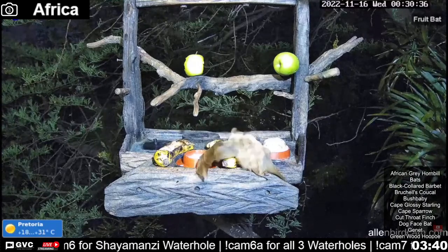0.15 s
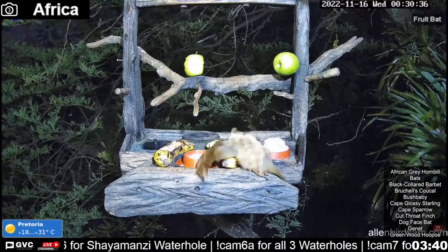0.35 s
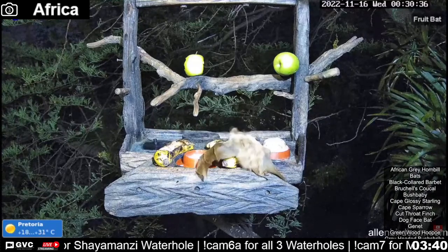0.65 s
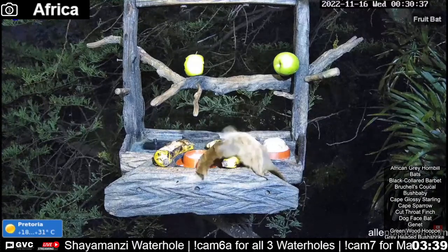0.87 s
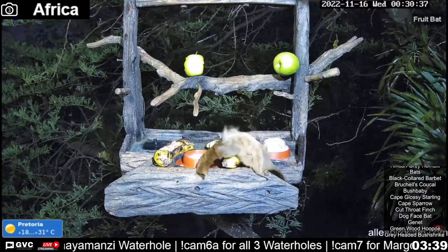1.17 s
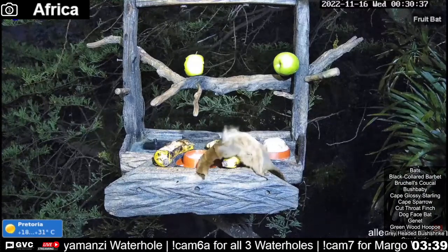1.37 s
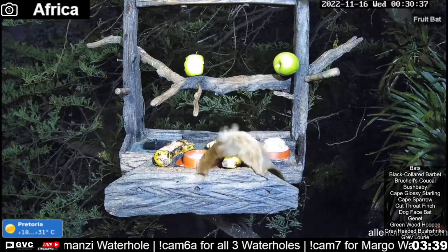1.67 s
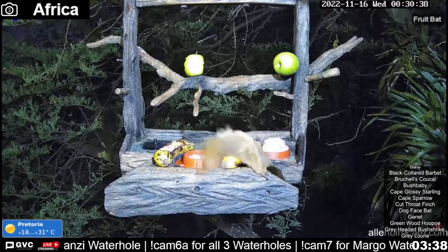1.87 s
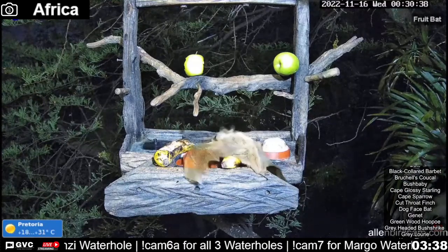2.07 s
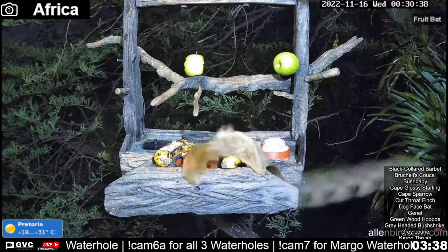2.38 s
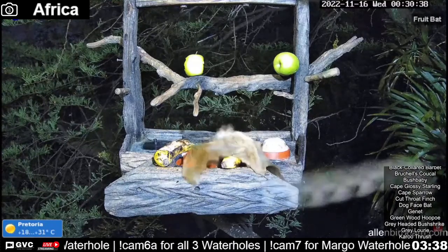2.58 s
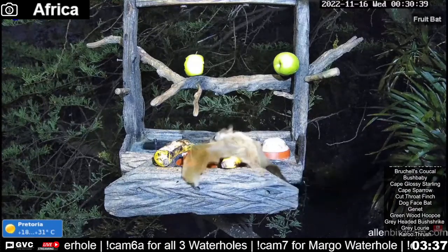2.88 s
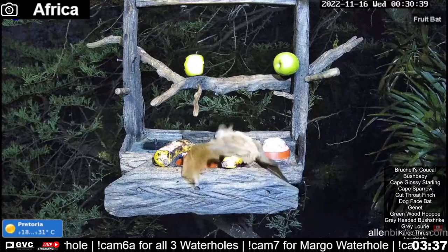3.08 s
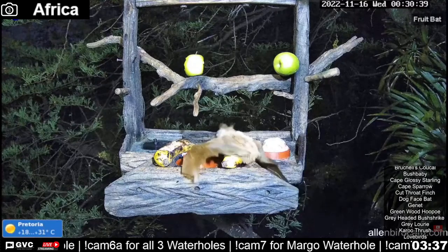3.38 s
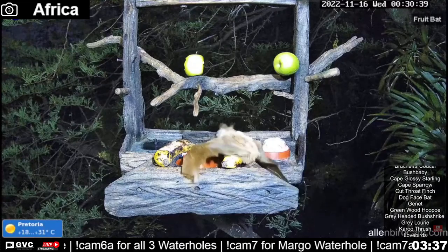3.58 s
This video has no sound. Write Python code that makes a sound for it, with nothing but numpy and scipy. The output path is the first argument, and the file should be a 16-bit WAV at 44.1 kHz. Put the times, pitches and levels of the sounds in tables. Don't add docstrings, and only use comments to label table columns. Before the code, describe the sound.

Rattling toad croaks fill a night garden, with three brief bat chirps and sharp claw ticks

```python
import sys
import numpy as np
from scipy import signal
from scipy.fft import rfft, irfft
from scipy.io import wavfile
from scipy.ndimage import uniform_filter1d

SR = 44100
rng = np.random.default_rng(int(sys.argv[2]) if len(sys.argv) > 2 else 0)


def to_wav(s):
    ch = np.atleast_2d(s).T
    pcm = np.round(np.clip(ch, -1, 1) * 32767)
    wavfile.write(sys.argv[1], SR, pcm.astype(np.int16))


def invert_db(level):
    return 10 ** (np.asarray(level, dtype=float) / 20)


N = 164934


def evened(x):
    return x / np.sqrt(np.mean(x ** 2) + 1e-20)


def wander(n, width):
    return evened(uniform_filter1d(rng.standard_normal(n), width))


def read(points, hz):
    f, value = np.transpose(points)
    return np.interp(np.log(hz + 1), np.log(f + 1), value)


def colour(x, points):
    return irfft(rfft(x) * invert_db(read(points, np.fft.rfftfreq(N, 1 / SR))), N)


def add(mix, s, sound):
    part = mix[max(round(s * SR), 0):][:len(sound)]
    part += sound[:len(part)]


def resonate(x, hz, width_hz):
    turn = np.exp(2j * np.pi * np.cumsum(hz * np.ones(len(x))) / SR)
    r = np.exp(-np.pi * width_hz * 1.5 / SR)
    return 2 * (turn * signal.lfilter([(1 - r) ** 2], [1, -2 * r, r * r], x / turn)).real


def garden(x, echo_db, t60_s):
    t = np.arange(SR // 2) / SR
    tail = rng.standard_normal((2, len(t)))
    tail = tail * (rng.random((2, len(t))) < .06)
    tail = tail * invert_db(-60 * t / t60_s) * np.minimum(t / 0.013, 1)
    return x + invert_db(echo_db) * irfft(rfft(x) * rfft(tail / np.linalg.norm(tail[0]), N), N)


# start in seconds, length in seconds, level in dB, settled pitch in Hz, settling in seconds.
CHIRPS = [
    (1.016, 0.074, -38, 1635, 0.084),
    (2.036, 0.062, -35.5, 1656, 0.05),
    (3.326, 0.058, -38, 1629, 0.03),
]
# level in dB, from the fundamental up.
PARTIALS_DB = [-7, -1.5, 0, -11, -27, -50]


def bat():
    drop, rise_s, fall_s, flutter_db = 0.17, .026, 0.052, 2.5
    out = np.zeros(N)
    t = np.arange(0, .2, 1 / SR)
    for start, length_s, level_db, hz, settle_s in CHIRPS:
        turns = np.cumsum(hz * (1 + drop * np.clip(1 - t / settle_s, 0, 1) ** 1.6)) / SR
        shape = np.minimum(t / min(rise_s, settle_s), 1) ** 0.59
        shape = shape * np.clip((length_s + fall_s - t) / fall_s, 0, 1) ** 2
        flutter = uniform_filter1d(rng.standard_normal(len(t)), 200)
        shape = shape * invert_db(flutter_db * evened(uniform_filter1d(flutter, 200)))
        call = np.zeros(len(t))
        for k, db in enumerate(PARTIALS_DB):
            opening = np.minimum(t / settle_s, 1) ** (.4 * k)
            call += invert_db(db) * opening * np.sin(2 * np.pi * (k + 1) * turns)
        add(out, start, invert_db(level_db) * shape * call)
    return garden(out, echo_db=0.5, t60_s=.5)


# time in seconds, effort in dB, throat pitch in Hz.
CHORUS = [(0, -30, 1280), (0.198, -40.5, 1420), (0.262, -65, 1350), (.47, -44, 1237), (0.519, -41.5, 1210),
          (.8, -32, 1243), (1.349, -33, 1211), (1.552, -33, 1192), (1.951, -32, 1303), (2.348, -36, 1157),
          (2.502, -33, 1256), (3.74, -30, 1208)]
# ratio to throat pitch, width in Hz, level in dB.
SAC = [(0.377, 56.5, -22.5), (.7, 105.2, -8.5), (0.802, 120.4, -31), (1.001, 232.5, 23.5),
       (1.18, 140.4, -18.5), (1.328, 107.3, -31.5), (1.852, 372, 5.5), (2.198, 418, 5.5), (2.95, 205, -5.5)]
TOAD_RATES_HZ = [8.6, 31, 14.5, 16, 17, 15, 29, 18]


def toad_crowd():
    pulse_s, swell_db = 0.0063, 2.5
    t = np.arange(N) / SR
    s, effort_db, throat_hz = np.transpose(CHORUS)
    beats = np.zeros(N)
    for rate_hz in TOAD_RATES_HZ:
        drift = wander(N, 9000)
        turns = np.floor(np.cumsum(rate_hz * (1 + 0.0826 * drift)) / SR + rng.random())
        beats[1:] += np.diff(turns) * invert_db(swell_db * np.roll(drift, N // 2)[1:])
    puff = signal.windows.hann(round(pulse_s * SR) * 2)
    rasp = signal.oaconvolve(beats, puff)[:N] * rng.standard_normal(N)
    pitch_hz = np.interp(t, s, throat_hz)
    sac = np.zeros(N)
    for k, (ratio, width_hz, db) in enumerate(SAC):
        sac += (-1) ** k * invert_db(db) * resonate(rasp, ratio * pitch_hz, width_hz)
    return evened(garden(sac, echo_db=8, t60_s=0.86)) * invert_db(np.interp(t, s, effort_db) - 3.0)


# start in seconds, peak in dB, throat pitch in Hz.
FIRST_BOUT = [(0.062, -20.5, 1204), (0.113, -34, 1300), (0.135, -25, 1370), (0.19, -35, 1176),
              (0.271, -36, 1360), (0.332, -34.5, 1250), (0.394, -40.5, 1355), (0.412, -40.5, 1250),
              (0.433, -39, 1090), (0.492, -37.5, 1230), (0.512, -25.5, 1213), (0.54, -44, 1150),
              (0.558, -29, 1197), (0.573, -36, 1247), (0.596, -22.5, 1206), (0.637, -30, 1270),
              (0.67, -22.5, 1155), (0.709, -25.5, 1215), (0.757, -23, 1258), (0.771, -24.5, 1214),
              (0.791, -30.5, 1180), (0.82, -28.5, 1210), (0.837, -20, 1222), (0.889, -20.5, 1313),
              (0.953, -22.5, 1224), (0.981, -20.5, 1216), (1.01, -25.5, 1252), (1.024, -21, 1238),
              (1.043, -22.5, 1175), (1.082, -15.5, 1215), (1.137, -23, 1207), (1.163, -22, 1160),
              (1.201, -17.5, 1256), (1.231, -35.5, 1214), (1.257, -20.5, 1202), (1.292, -31.5, 1196),
              (1.315, -22, 1207), (1.344, -20.5, 1208), (1.367, -29, 1247), (1.422, -26.5, 1280),
              (1.467, -21.5, 1280), (1.518, -25.5, 1233), (1.576, -31, 1220), (1.592, -23.5, 1314),
              (1.612, -33, 1220), (1.642, -36, 1250), (1.674, -19.5, 1354), (1.71, -29.5, 1040),
              (1.728, -22, 1180), (1.761, -24.5, 1390), (1.8, -31, 1304), (1.822, -27, 1100),
              (1.847, -22, 1308), (1.863, -26, 1162), (1.908, -29, 1060), (1.921, -21, 1320)]
# start in seconds, peak in dB, throat pitch in Hz.
SECOND_BOUT = [(1.993, -23.5, 1082), (2.028, -26.5, 1194), (2.064, -21, 1047), (2.098, -31.5, 1293),
               (2.138, -22.5, 1163), (2.176, -34, 1247), (2.203, -26.5, 1114), (2.245, -28, 1148),
               (2.264, -35.5, 1284), (2.286, -23, 1148), (2.312, -34.5, 1316), (2.342, -25, 1077),
               (2.384, -27, 1230), (2.402, -22.5, 1200), (2.447, -31.5, 1166), (2.464, -23.5, 1130),
               (2.49, -26, 1224), (2.523, -24.5, 1050), (2.576, -25.5, 1105), (2.607, -29, 1310),
               (2.632, -23.5, 1330), (2.675, -22.5, 1340), (2.715, -29, 1170), (2.735, -22.5, 1148),
               (2.754, -37.5, 1223), (2.796, -25.5, 1290), (2.815, -32.5, 1293), (2.847, -25.5, 1220),
               (2.893, -18.5, 1190), (2.914, -26, 1210), (2.967, -26.5, 1146), (2.985, -24.5, 1140),
               (3.032, -29, 1346), (3.079, -21.5, 1230), (3.102, -25, 1172), (3.152, -19.5, 1204),
               (3.227, -22.5, 1220), (3.289, -20.5, 1222), (3.322, -28.5, 1143), (3.354, -20.5, 1146),
               (3.391, -22, 1176), (3.418, -18, 1170), (3.479, -18.5, 1175), (3.504, -22, 1184),
               (3.535, -27.5, 1225), (3.593, -25.5, 1190), (3.621, -23.5, 1160), (3.644, -19.5, 1284),
               (3.696, -24, 1150), (3.712, -19.5, 1300)]


def near_toads():
    rise_s, fall_s, repeat_s, near_db, repeat_db = 0.0017, 0.0037, .0055, -2, -5
    out = np.zeros(N)
    t = np.arange(1500) / SR
    knock = (1 - np.exp(-t / rise_s)) * np.exp(-t / fall_s) * 2
    thump = 0.04 * np.sin(2 * np.pi * 460 * t) * np.sin(np.pi * np.minimum(t / 0.024, 1))
    for start, db, hz in FIRST_BOUT + SECOND_BOUT:
        modes = np.sin(2 * np.pi * hz * t)
        modes = modes + 0.38 * np.sin(2 * np.pi * 0.842 * hz * t)
        modes = modes + 0.13 * np.sin(2 * np.pi * 2.1 * hz * t)
        ring = knock * modes + thump
        add(out, start, invert_db(db + near_db) * ring)
        add(out, start + repeat_s, invert_db(db + near_db + repeat_db) * ring)
    return garden(out, echo_db=-7.5, t60_s=0.48)


# frequency in Hz, gain in dB.
BANKS = [(200, -26.5), (350, -11.5), (480, 2), (600, -18.5), (750, -18.5), (820, 0), (1600, -2), (1850, -4),
         (2100, 1)]


def toads():
    return colour(toad_crowd() + near_toads(), BANKS)


# start in seconds, peak in dB, colour in Hz.
TICKS = [
    (.2622, -49, 10400),
    (0.405, -33.5, 7400),
    (.5225, -52, 8300),
    (0.5877, -50.5, 9100),
    (0.682, -52.5, 8500),
    (1.0878, -22, 10200),
    (1.52, -52.5, 8200),
    (1.8157, -25, 9550),
]
# start in seconds, length in seconds, level in dB, colour in Hz.
SCRAPES = [(0.388, 0.027, -59.5, 7600), (0.512, 0.12, -71, 8950), (1.075, 0.04, -50, 8800),
           (1.076, 0.03, -52.5, 13400), (2.033, 0.028, -72.5, 13600), (1.355, 0.073, -71.5, 9500),
           (1.8165, 0.0089, -40, 7500), (1.819, 0.01, -47.5, 5030), (2.017, 0.044, -65, 9300),
           (2.426, 0.026, -67.5, 10000), (3.578, .08, -75.5, 9100)]


def claws():
    out = np.zeros(N)
    t = np.arange(0, .03, 1 / SR)
    for start, db, hz in TICKS:
        snap = rng.standard_normal(len(t)) * np.exp(-t / .0012) * np.minimum(t / 0.00037, 1)
        wide = invert_db(1.1 * (db + 23)) * snap
        snap = wide + 1.4 * resonate(snap, hz, 940)
        add(out, start, invert_db(db) * snap / abs(snap).max())
    for start, length_s, db, hz in SCRAPES:
        dry = rng.standard_normal(round(length_s * SR))
        dry = dry * invert_db(5 * wander(len(dry), 150))
        rustle = 0.14 * dry + 2 * resonate(dry, hz, 1300)
        add(out, start, invert_db(db) * signal.windows.tukey(len(dry), .6) * rustle)
    band = signal.butter(2, [1500, 14800], "band", fs=SR, output="sos")
    return garden(signal.sosfilt(band, out), echo_db=-14, t60_s=.25)


# start in seconds, length in seconds, level in dB, pitch in Hz.
PHRASES = [(0.017, 0.13, -57.5, 5750), (.264, 0.17, -58, 5700), (0.291, 0.096, -67, 5640),
           (0.496, 0.039, -55.5, 5700), (0.655, 0.14, -55, 5770), (0.828, .1, -57.5, 5840),
           (1.001, 0.16, -52.5, 5650), (1.228, .06, -57, 5680), (1.382, 0.14, -55, 5810),
           (1.569, 0.1, -58.5, 5670), (1.707, 0.21, -59.5, 5655), (2.275, .3, -64, 5830),
           (2.396, .36, -61, 5610), (3.156, 0.093, -58, 5680), (3.147, 0.12, -61.5, 5270),
           (0.759, 0.1, -57, 3680)]


def cricket():
    sag_hz_per_s, trill_hz, stroke_share = 18000, 31.5, .5
    out = np.zeros(N)
    for start, length_s, db, hz in PHRASES:
        t = np.arange(0, length_s, 1 / SR)
        strokes = np.sin(np.pi * np.minimum(t * trill_hz % 1 / stroke_share, 1))
        start_hz = hz + sag_hz_per_s * stroke_share / trill_hz / 2
        turns = start_hz * t - sag_hz_per_s / 2 * (t % (1 / trill_hz)) ** 2
        add(out, start, invert_db(db + 6.5) * strokes * np.sin(2 * np.pi * turns))
    return out


def whistles():
    peeper_end_s, peeper_fade_s = .63, 0.093
    swell_db = 2.5 * wander(N, 12000)
    katydid = evened(resonate(rng.standard_normal(N), 4583, 170)) * invert_db(-69 + swell_db)
    peeper = evened(resonate(rng.standard_normal(N), 2900, 110)) * invert_db(-55)
    return katydid + peeper * np.clip((peeper_end_s - np.arange(N) / SR) / peeper_fade_s, 0, 1)


def insects():
    return garden(cricket() + whistles(), echo_db=-3, t60_s=.3)


# frequency in Hz, density in dB per Hz.
FAR = [(120, -72.5), (200, -48.5), (547, -4.5), (1020, -54), (1270, 4.5), (1770, -1.5), (2520, -10.5),
       (2940, 6), (4200, -36.5), (5460, -59), (9240, -120)]
# frequency in Hz, density in dB per Hz.
AIR = [(2000, -68), (3400, 16.5), (3650, -7.5), (3930, 12), (4670, 6), (5690, 8), (6800, -2.5),
       (7400, -11.5), (15500, -61)]


def wash(spectrum, level_db, patch_db):
    hz = np.fft.rfftfreq(512, 1 / SR)
    a, b, c, d, patches = rng.standard_normal((N // 128 + 5, 257, 5)).T
    patches = evened(uniform_filter1d(uniform_filter1d(patches, 4, 0), 24, 1))
    z = np.array([a + 1j * b, c + 1j * d])
    z = z * invert_db(read(spectrum, hz)[:, None] + patch_db * patches)
    return invert_db(level_db) * evened(signal.istft(z, nperseg=512, noverlap=384)[1][:, :N])


def night():
    s, effort_db, _ = np.transpose(CHORUS)
    hush_db = 0.16 * np.minimum(np.interp(np.arange(N) / SR, s, effort_db) + 36, 0)
    return wash(FAR, -53 + hush_db, 2.5) + wash(AIR, -58.5, 5)


# frequency in Hz, left minus right in dB.
LEFT = [(300, -11.5), (700, -54), (1300, -23), (3000, -29), (4500, -62), (9000, -70.5)]


def scene():
    lag_samples, shared, bat_left_db = 32, .6, 8.5
    caller = 2 * bat()
    own, right = 2 * (toads() + claws() + insects() + night()) + caller
    own = own + invert_db(bat_left_db) * caller[0]
    left = shared * np.roll(right, lag_samples) + np.sqrt(1 - shared ** 2) * own
    return np.array([colour(left, LEFT), right])


def low_pass(x):
    return signal.sosfilt(signal.butter(12, 15670, fs=SR, output="sos"), x)


def record(dry):
    low_cut = signal.butter(5, 250, "high", fs=SR, output="sos")
    mix = signal.sosfilt(low_cut, dry)
    return low_pass(mix)


dry = scene()
out = record(dry)
to_wav(out)
```